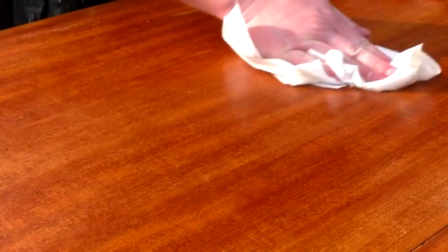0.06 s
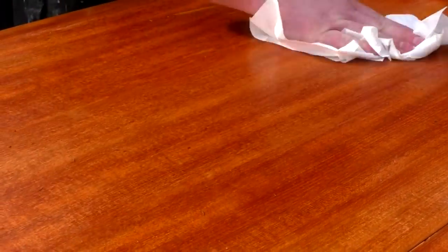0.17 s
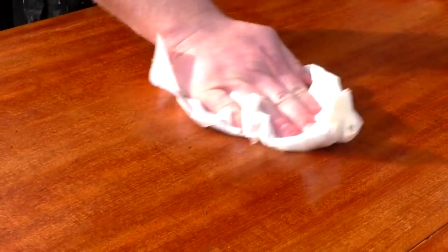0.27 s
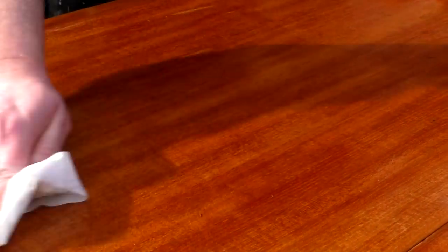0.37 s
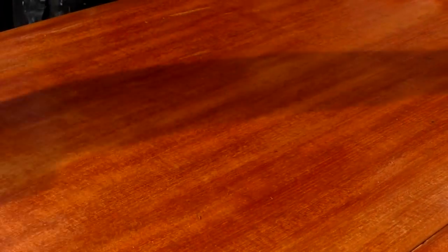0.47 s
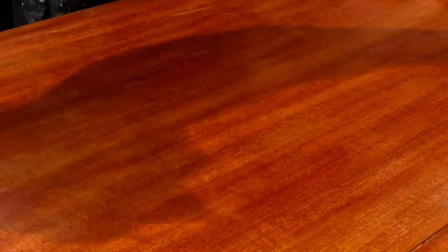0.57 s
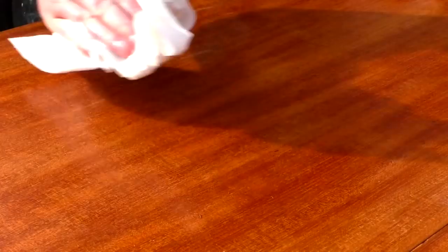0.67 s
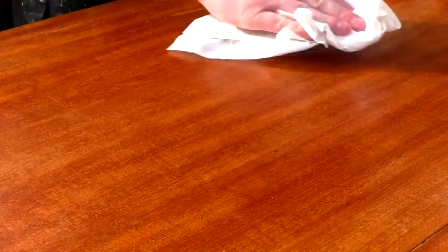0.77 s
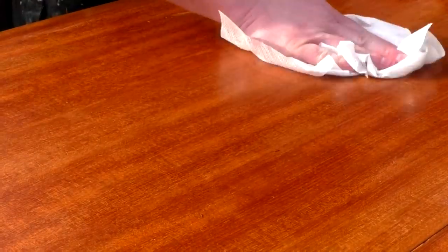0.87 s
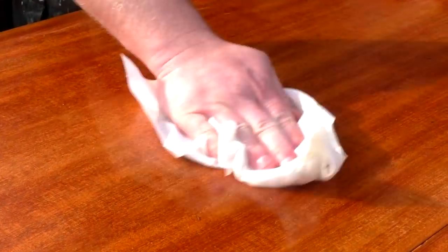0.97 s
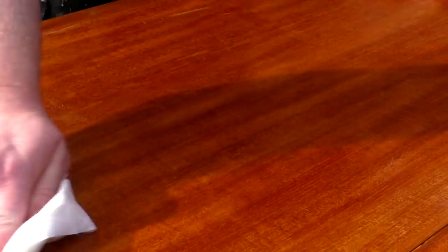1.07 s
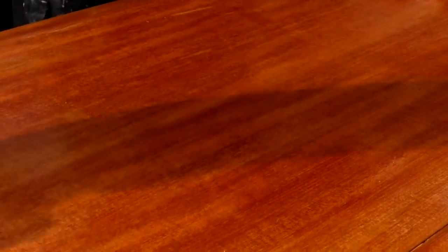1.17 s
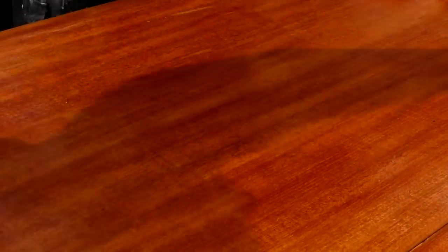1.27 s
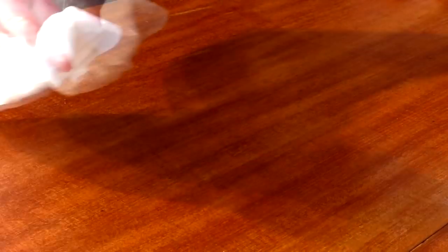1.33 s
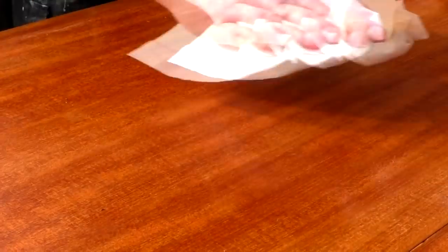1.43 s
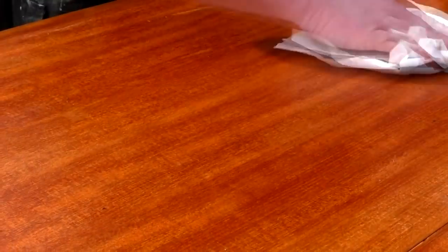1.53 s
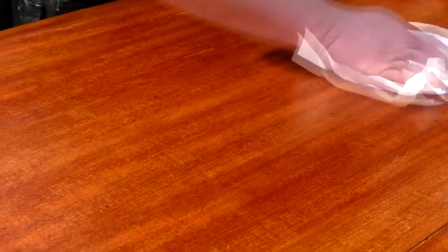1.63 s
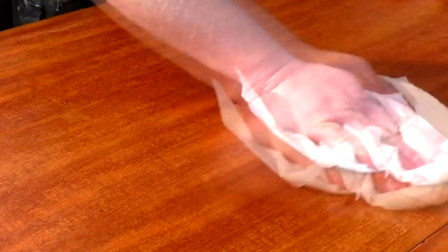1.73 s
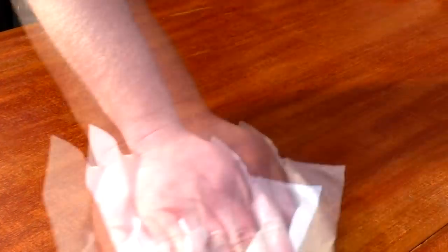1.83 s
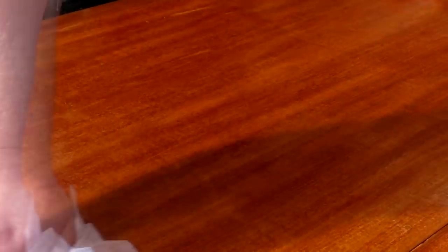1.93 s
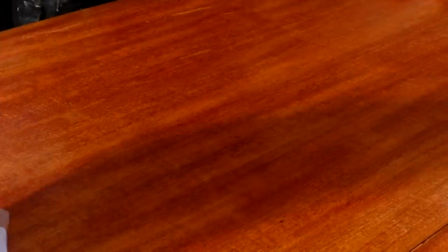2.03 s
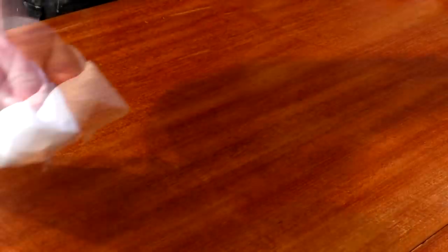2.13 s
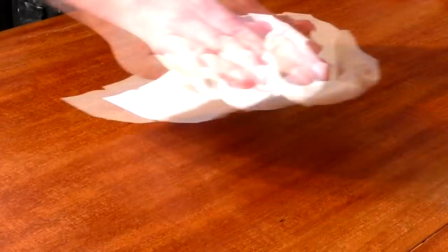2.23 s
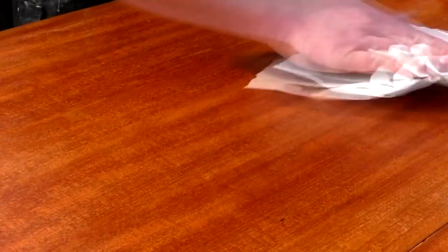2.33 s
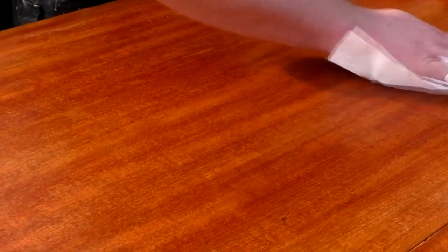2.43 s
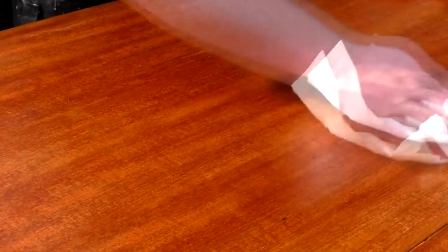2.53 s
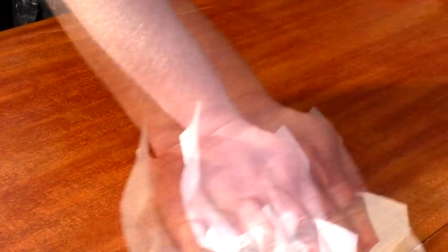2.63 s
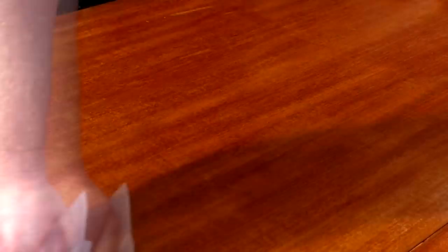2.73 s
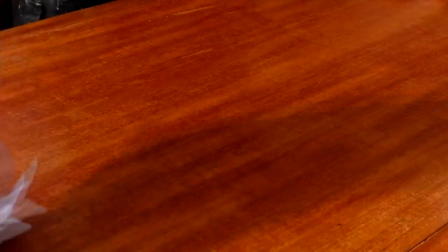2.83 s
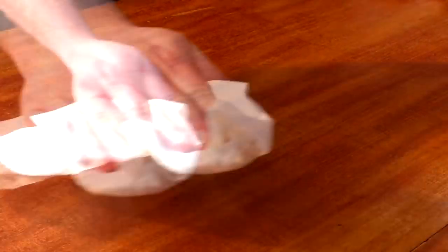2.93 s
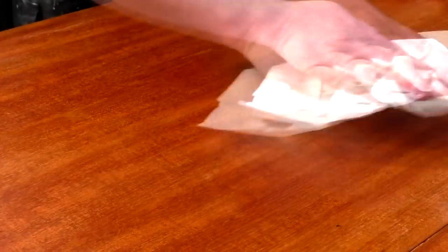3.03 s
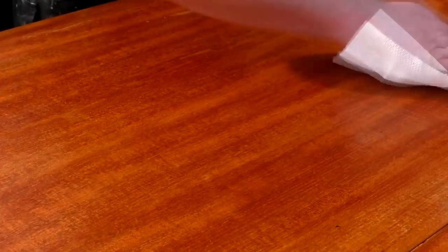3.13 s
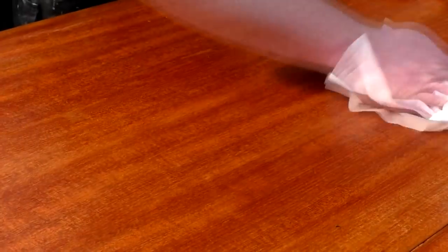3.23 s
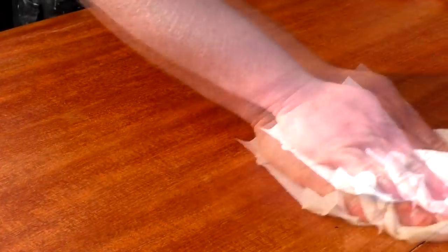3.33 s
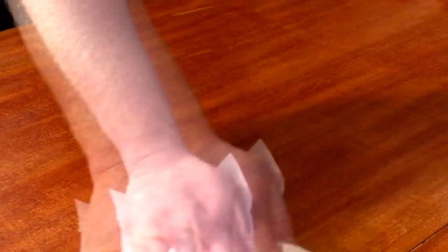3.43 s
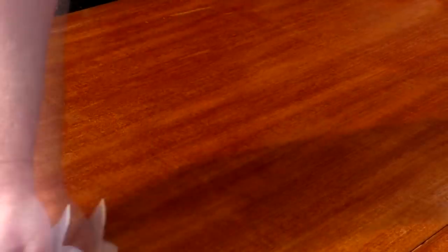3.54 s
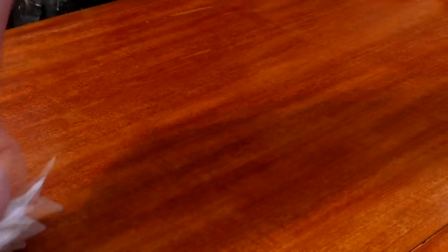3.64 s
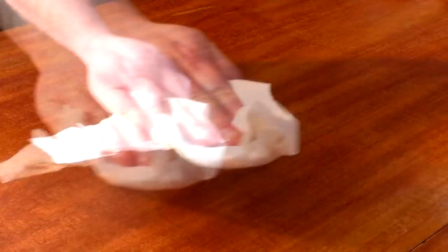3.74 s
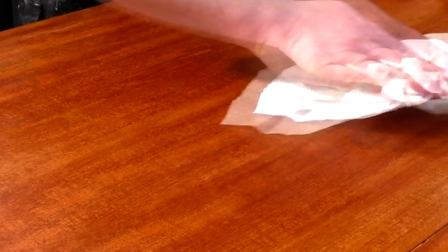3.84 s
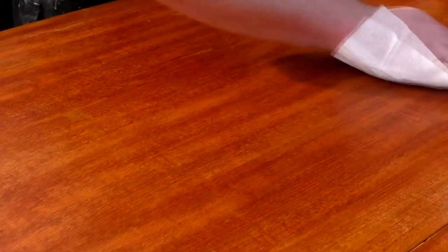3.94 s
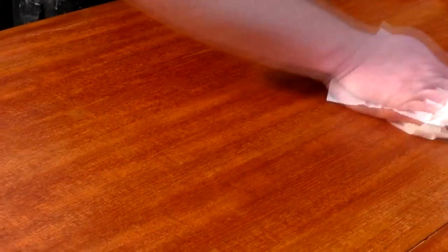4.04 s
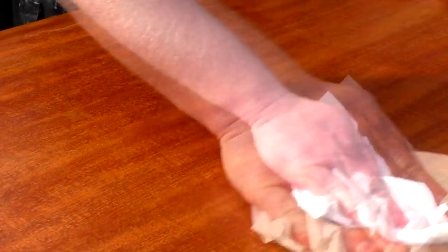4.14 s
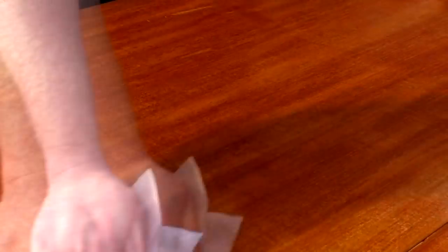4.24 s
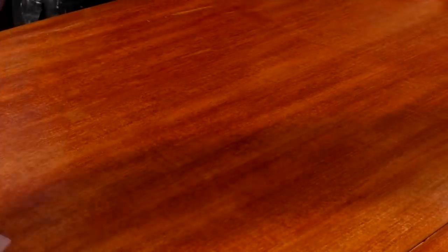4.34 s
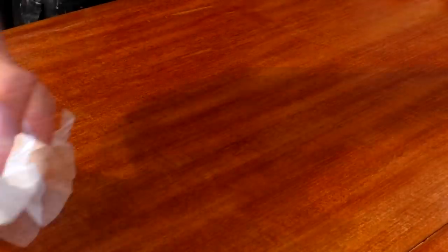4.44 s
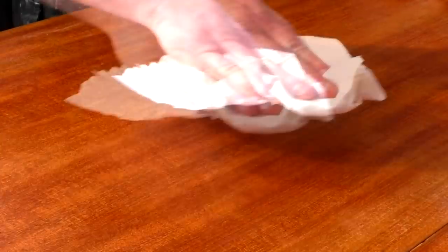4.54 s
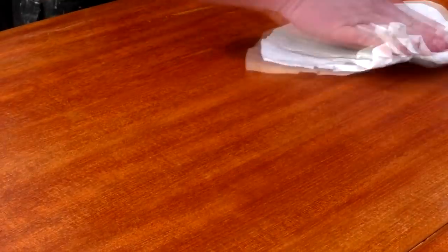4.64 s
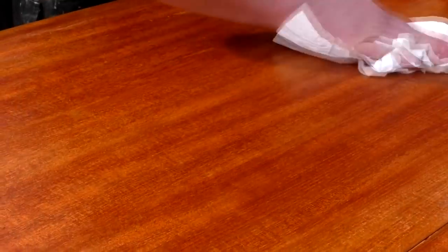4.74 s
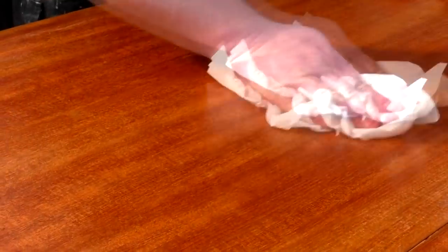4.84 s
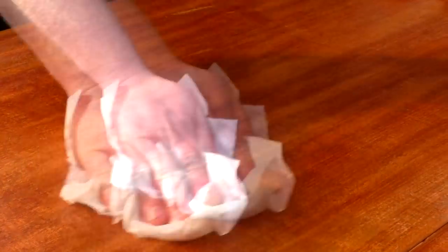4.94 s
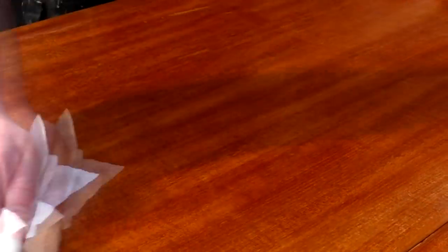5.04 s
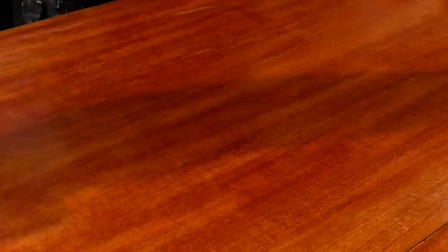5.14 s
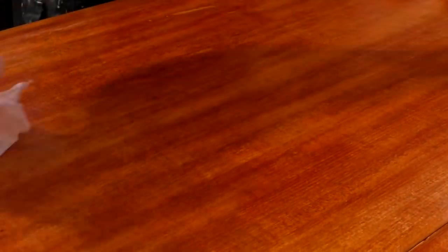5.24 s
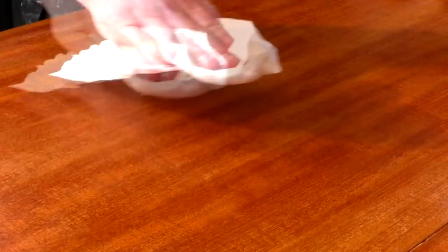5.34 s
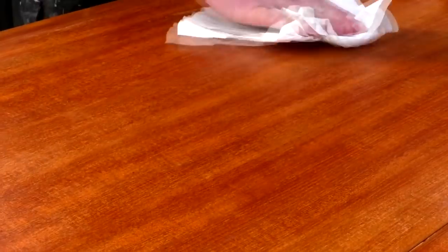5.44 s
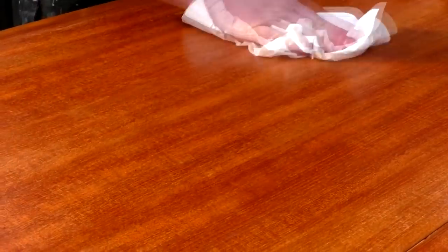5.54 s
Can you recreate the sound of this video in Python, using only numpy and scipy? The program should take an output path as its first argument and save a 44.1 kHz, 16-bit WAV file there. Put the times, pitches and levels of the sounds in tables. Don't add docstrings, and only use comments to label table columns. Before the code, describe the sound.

Close stereo pickup in a quiet workshop with a faint steady hum. A crumpled cloth swishes over varnished wood, first in a rapid flurry, then in separate strokes less than a second apart. Each shove makes the table knock dully on its legs and ring low and briefly; between strokes the cloth rustles and creeps almost silently, with tiny squeaks.

```python
import sys
import numpy as np
from scipy import signal
from scipy.io import wavfile
from scipy.ndimage import uniform_filter1d

SR = 44100
rng = np.random.default_rng(int(sys.argv[2]) if len(sys.argv) > 2 else 0)


def dump(signal):
    limited = np.clip(np.atleast_2d(signal).T, -1, 1)
    pcm = np.round(limited * 32767).astype(np.int16)
    wavfile.write(sys.argv[1], SR, pcm)


def ratio_of_db(decibels):
    return 10 ** (np.asarray(decibels, float) / 20)


N = 246866
STEP = 32
SIDES = np.array([[1], [-1]])


def rms_one(x):
    return x / np.sqrt(np.mean(x ** 2) + 1e-20)


def in_time(rows):
    s, *columns = np.transpose(rows)
    return [np.interp(np.arange(N) / SR, s, column) for column in columns]


def fine(curve):
    return np.interp(np.arange(N), np.arange(0, N, STEP), curve)


def at_hz(points, hz):
    point_hz, value = np.transpose(points)
    return np.interp(np.log(hz), np.log(point_hz), value)


def tent(start, end, start_db, end_db, rise, fall):
    t = np.arange(0, N, STEP) / SR
    plateau_db = np.interp(t, [start, end], [start_db, end_db])
    return plateau_db - rise * np.maximum(start - t, 0) - fall * np.maximum(t - end, 0)


def drift(rate_hz):
    r = np.exp(-80 * np.pi * rate_hz / SR)
    slow = signal.lfilter([1], [1, -2 * r, r * r], rng.standard_normal(N // 40 + 2002))[2000:]
    return np.interp(np.arange(N) / 40, np.arange(len(slow)), rms_one(slow))


def ring(force, hz, t60):
    r = ratio_of_db(-60 / (t60 * SR))
    w = 2 * np.pi * hz / SR
    return signal.lfilter([0, np.sin(w)], [1, -2 * r * np.cos(w), r * r], force + 1e-18)


def slips(per_s, spread_db):
    sizes = ratio_of_db(spread_db * rng.exponential(1, (2, 2, N))) * rng.standard_normal((2, 2, N))
    return sizes * (rng.random((2, 2, N)) < per_s / SR)


def coloured(source, spectrum, likeness, patchy_db, tilt=((100, 0), (200, 0))):
    out, together = 0, drift(22.0)
    lowest, highest = spectrum[0][0], spectrum[-1][0]
    edges = np.geomspace(lowest, highest, int(3 * np.log2(highest / lowest)) + 2)
    for k, (low, high) in enumerate(zip(edges, edges[1:])):
        band = signal.butter(2, [low, high], "band", fs=SR, output="sos")
        mid, side = signal.sosfilt(band, source[k % 2])
        hz = np.sqrt(low * high)
        alike = np.clip(at_hz(likeness, hz), -1, 1)
        flicker_db = patchy_db * (0.7 * together + 0.83 * drift(2.8))
        gain = ratio_of_db(at_hz(spectrum, hz) + flicker_db)
        lean = ratio_of_db(at_hz(tilt, hz) / 2 * SIDES)
        out = out + gain * lean * (np.sqrt(1 + alike) * mid + np.sqrt(1 - alike) * side * SIDES)
    return rms_one(out)


def glides(rows, rough, blur_hz=0):
    out, waver, flutter = np.zeros(N), drift(55), drift(25)
    for s, length, level_db, start_hz, end_hz in rows:
        at = int(s * SR) + np.arange(int(1.24 * length * SR))
        hz = np.linspace(start_hz, end_hz, len(at)) * (1 + rough * waver[at])
        fading_db = level_db + 4.0 + 4.17 * flutter[at] - 9.6 * np.linspace(0, 1, len(at))
        swell = np.sqrt(np.hanning(len(at))) * ratio_of_db(fading_db)
        out[at] += swell * np.sin(2 * np.pi * np.cumsum(hz) / SR)
    return out * drift(blur_hz) if blur_hz else out


# (frequency [Hz], level [dB per Hz])
ROOM = [(15, -44), (25, -12), (60, -11), (91, -3), (161, 1.5), (234, -5), (360, -5.5), (447, -12),
        (555, -13), (809, -15), (1390, -12.5), (1770, -22.5), (3110, -22.5), (5630, -45.5), (12500, -43),
        (15700, -52)]
# (frequency [Hz], left-right likeness [0..1])
ROOM_LIKENESS = [(60, 0.98), (180, 0.99), (550, 0.84), (1650, 0.41), (4970, 0.16), (15000, 0.27)]
# (frequency [Hz], left over right [dB])
ROOM_TILT = [(60, -0.5), (240, -1), (950, -1.5), (3770, 3.5), (15000, 5)]
# (frequency [Hz], width [Hz], level [dB])
ROOM_TONES = [(450.2, 28, -74.5), (227.8, 19, -74.5), (703, 18, -82.5), (95.2, 16, -73)]


def room():
    noise = rng.standard_normal((2, 2, N))
    hum = ratio_of_db(-61.5) * coloured(noise, ROOM, ROOM_LIKENESS, 0.65, ROOM_TILT)
    for hz, width_hz, level_db in ROOM_TONES:
        tone = ring(rng.standard_normal(N), hz, 3.8 / width_hz)
        hum += ratio_of_db(level_db + 2 * drift(2.1)) * rms_one(tone) * ratio_of_db(-2.5 * SIDES)
    return hum


# (time [s], level [dB])
DRAUGHT = [(0, -66), (.2, -56), (.35, -60), (.6, -68), (1.0, -60.5), (1.2, -65), (1.45, -76), (1.9, -67),
           (2.3, -78), (2.7, -74), (3.7, -90), (4.25, -74), (4.6, -80), (5.1, -74), (5.6, -86)]


def draught():
    band = signal.butter(2, [22, 130], "band", fs=SR, output="sos")
    lumps_db = 3.5 * np.array([drift(14), drift(14)])
    gusts = rms_one(signal.sosfilt(band, rng.standard_normal((2, N))) * ratio_of_db(lumps_db))
    pan_db = -3
    return gusts * ratio_of_db(in_time(DRAUGHT)[0] + pan_db / 2 * SIDES)


# (time [s], hiss level [dB])
CREEP = [(0, -89), (.8, -87), (1.32, -80), (1.45, -82), (1.57, -90), (2.12, -79), (2.25, -85), (2.36, -93),
         (2.9, -76), (2.96, -90), (3.12, -100), (3.73, -75), (3.79, -79), (3.83, -86), (4.6, -85),
         (5.3, -87), (5.43, -89), (5.6, -90)]
# (time at full speed [s], time slowing starts [s], hiss level at each [dB, dB], rise [dB per s])
STROKES = [
    (.03, .21, -52.5, -49.5, 150),
    (.28, .43, -48, -50.5, 700),
    (.47, .56, -60, -63, 300),
    (.99, 1.175, -51, -51, 179),
    (1.78, 2.04, -50.5, -52.5, 130),
    (2.64, 2.83, -50.5, -49, 114),
    (3.36, 3.6, -49, -47.5, 170),
    (4.11, 4.365, -51, -47.5, 190),
    (4.86, 5.15, -49.5, -54, 352),
    (5.57, 5.575, -62, -69, 198),
]
# (time from its marks [s], pressure that lifts the wood colour [dB])
ALONG = [
    (-.15, 0),
    (0, -3),
    (0, 0),
    (0, 1),
    (.12, 12),
]
# (time [s], hiss level [dB], pressure [dB], rise [dB per s],
# fall [dB per s])
BRUSHES = [(.93, -58, 2.5, 400, 300), (2.434, -73, -2, 150, 60), (2.989, -69.5, 7.5, 500, 480),
           (2.8, -76, -20, 1800, 38), (3.936, -71, -2, 1500, 68), (4.04, -64, -14, 370, 700),
           (4.535, -69.5, 16, 604, 259), (4.565, -69.5, 1, 304, 600), (5.215, -61, 4, 202, 349),
           (2.2, -79, 1, 100, 67), (2.49, -70.5, 18, 292, 300), (4.705, -72, 3, 1500, 40),
           (4.8, -68, 5, 600, 100), (5.468, -77, -4, 1500, 20), (1.28, -70, 1, 300, 250),
           (5.33, -74.5, 2.5, 130, 149), (4.41, -62.5, 8, 148, 300), (0.223, -66, 2, 400, 600),
           (1.47, -84.5, 8, 150, 150), (2.78, -56.5, 8, 150, 150), (.42, -61, 6, 200, 300),
           (1.66, -62.5, 4, 500, 300), (3.262, -61, 0, 1200, 200), (2.875, -62, 2, 100, 1200),
           (2.92, -70, 4, 100, 500), (2.01, -55, -6, 200, 200), (1.965, -56.5, 7, 150, 150),
           (3.52, -58, 5, 150, 150), (1.134, -59, 5, 150, 150), (5.05, -62, 5, 200, 200)]


def sweeps():
    t = np.arange(0, N, STEP) / SR
    lead, pressure_db = np.transpose(ALONG)
    moves = [(in_time(CREEP)[0][::STEP], -2.5)]      # (hiss dB, pressure dB)
    slowing, snatch = 259, 461
    ease_s, late_share = 0.028, 0.85
    for k, (full, slows, full_db, slows_db, rise) in enumerate(STROKES):
        fall = snatch if k in (0, 4, 5) else slowing
        level_db = tent(full, slows, full_db, slows_db, rise, fall)
        ease = int(2 * ease_s * SR / STEP * min(1, slowing / rise)) + 1
        level_db = uniform_filter1d(level_db, ease)
        level_db += 0.5 * np.sin(np.pi * np.clip((t - full) / (slows - full), 0, 1))
        late = full + late_share * (slows - full)
        marks = lead + [full, full, late, slows, slows]
        moves.append((level_db, np.interp(t, marks, pressure_db)))
    for s, db, press_db, rise, fall in BRUSHES:
        moves.append((tent(s, s, db, db, rise, fall), press_db))
    powers = [ratio_of_db(2 * level_db) for level_db, _ in moves]
    total = sum(powers)
    pressure = sum(power * press_db for power, (_, press_db) in zip(powers, moves)) / total
    return fine(10 * np.log10(total)), fine(pressure)


# (time [s], peak level [dB])
RUSTLES = [(0.26, -37.5), (0.6978, -53.5), (0.771, -58), (0.856, -50), (0.9144, -55), (1.225, -37),
           (1.34, -54), (1.584, -69), (1.648, -42.5), (2.4034, -50), (2.495, -42), (2.96, -50.5),
           (3.131, -51), (3.055, -62), (3.85, -62), (3.168, -53), (3.191, -47.5), (3.259, -42),
           (3.7664, -54), (3.934, -60), (4.014, -41), (4.516, -54), (4.697, -61), (4.777, -44), (4.84, -56),
           (5.463, -53), (5.5044, -52), (5.57, -43)]


def rustle_envelope():
    out, decay_s = np.zeros(N), 0.011
    t = np.arange(int(8 * decay_s * SR)) / (decay_s * SR)
    for s, peak_db in RUSTLES:
        puff = ratio_of_db(peak_db - 7.5) * (1 - np.exp(-1.5 * t)) ** 2 * np.exp(-t)
        at = int((s - .003) * SR)
        out[at:at + len(t)] += puff[:N - at]
    return out


# (frequency [Hz], level [dB per Hz])
FIBRE = [(2650, -12), (4500, -3), (5940, -6), (7500, -6), (9000, -2), (11200, -1), (15100, -8.5),
         (15700, -12)]
# (frequency [Hz], level [dB per Hz])
WOOD = [(1060, -18), (1800, -3.5), (2580, 2.5), (2870, 2.5), (4030, -0.5), (5000, -4.5), (5930, -9),
        (6500, -21), (8450, -13), (14300, -120)]
# (frequency [Hz], level [dB per Hz])
BODY = [(410, -37), (700, -7.5), (771, -18), (1310, 5.5), (1410, -2.5), (2100, -3), (2730, -27),
        (4620, -120)]
# (frequency [Hz], left-right likeness [0..1])
LIKENESS = [(60, 0.94), (110, 0.97), (200, 0.96), (380, 0.89), (700, 0.53), (1290, 0.91), (2380, 0.98),
            (4400, 0.96), (8120, 0.99), (15000, 0.95)]
# (time [s], left over right [dB])
PLACE = [(0.0, 3.0), (0.19, -1.0), (0.41, 0.0), (0.54, 4.5), (1.01, -1.5), (1.25, 4), (1.72, -2.5),
         (2.15, 3.5), (2.66, -3.5), (2.96, 4.5), (3.27, -2.0), (3.41, -2.0), (3.71, 3), (4.18, -3),
         (4.43, 3), (4.83, -1.5), (5.24, 3.5), (5.6, -1.0)]
# (time [s], wood colour [dB], hand's rub [dB])
GRIP = [(0, 2.5, 1), (.3, -3.5, -1.5), (.5, 2.5, 2), (1.1, 0.5, -1), (1.3, 1.5, 2), (1.75, 2, -1.5),
        (1.9, -1, 0.5), (2.05, 1, 2), (2.5, 2, 0), (2.8, 1, 0), (3.3, 1.5, -1.5), (3.5, -3.5, -1.5),
        (4.1, 0.5, -1), (4.3, -2.5, -5), (4.5, -3.5, 2.5), (4.88, -2.5, -5.5), (5.15, -1, -2.5),
        (5.6, -2, -0.5)]


def cloth():
    hiss_db, pressure_db = sweeps()
    pan_db, = in_time(PLACE)
    wood_db, hand_db = in_time(GRIP)
    rub_db = (0.51 - 1) * (hiss_db + 64) + 0.26 * pressure_db + hand_db
    pressure_db = pressure_db + wood_db
    flick = rustle_envelope()
    fibre = coloured(slips(16000, spread_db=1.5), FIBRE, LIKENESS, patchy_db=0.75)
    wood = coloured(slips(9000, spread_db=1.5), WOOD, LIKENESS, patchy_db=0.05)
    body = coloured(slips(4000, spread_db=1.0), BODY, LIKENESS, patchy_db=1.0)
    fibre_gain = np.hypot(ratio_of_db(hiss_db), flick)
    wood_gain = np.hypot(ratio_of_db(hiss_db + pressure_db - 0.82), ratio_of_db(3.0) * flick)
    body_gain = np.hypot(ratio_of_db(hiss_db + rub_db - 0.5), ratio_of_db(-2.0) * flick)
    lean = pan_db / 2 * SIDES
    sound = fibre_gain * fibre * ratio_of_db(1.2 * lean)
    sound += wood_gain * wood * ratio_of_db(1.1 * lean)
    sound += body_gain * body * ratio_of_db(0.61 * lean)
    return sound * ratio_of_db(0.91 * drift(16.4))


# (time [s], peak level [dB], deep modes [dB], hard modes [dB])
ROCKS = [(0.016, -32, 0, -18), (0.156, -41, 10, -14), (0.346, -30, -4.5, -20.5), (0.447, -23, -6, -12.5),
         (0.466, -33, 1.5, -7), (0.77, -54.5, 11, -28), (0.922, -45.5, 6, -9.5), (1.036, -27, -1, -17),
         (1.301, -47, 9.5, -5.5), (1.338, -46.5, -1, -11), (1.618, -41.5, -1, -35), (1.661, -42, 4.5, -11),
         (1.707, -25.5, -1, -16.5), (1.824, -28.5, 1.5, -16.5), (2.578, -27, 1, -12.5),
         (2.693, -27.5, 0, -15.5), (2.863, -44, 1, -20), (3.191, -32.5, 3, -14), (3.236, -41, 5, -13.5),
         (3.357, -27.5, 0.5, -15), (4.099, -28.5, -4, -18), (4.118, -35, -11, -9.5),
         (4.226, -26, -3, -15.5), (4.528, -36, -0.5, -22), (4.557, -44.5, -14, -14), (4.871, -35, 4, -22),
         (5.019, -27, -1.5, -14), (5.578, -48, 7, -27)]
# (time [s], peak level [dB], hard modes [dB], frequency struck best [Hz])
TAPS = [
    (0.189, -43, -11.5, 283),
    (0.502, -31, -7.5, 650),
    (1.891, -39.5, -6, 285),
    (2.602, -40.5, -4, 313),
    (3.329, -51, -4, 460),
    (5.06, -37, -11.5, 385),
    (5.085, -47, -14, 377),
    (5.115, -46.5, 6, 506),
    (5.204, -41.5, -4, 390),
]


def knock_forces():
    rocks = [(*rock, 3.02, 310.4) for rock in ROCKS]
    taps = [(s, db, -42.5, hard_db, 0.91, hz) for s, db, hard_db, hz in TAPS]
    knocks = np.array(rocks + taps)
    deep, main, hard = np.zeros((3, len(knocks), 1400))
    for k, (_, peak_db, deep_db, hard_db, contact_ms, _) in enumerate(knocks):
        luck = rng.standard_normal(8)
        width = int(contact_ms * SR / 1000)
        pulse = np.hanning(width + 2)[1:-1] / width * ratio_of_db(peak_db - 10.0)
        main[k, 110:110 + width] = pulse
        main[k, 260:260 + width] -= 1.14 * main[k, 110:110 + width]
        deep[k] = -main[k] * ratio_of_db(deep_db)
        for bounce in range(4):
            lag = int((0.005003 * bounce + 0.001384 * abs(luck[bounce])) * SR)
            click_db = peak_db + hard_db - 11.0 - 5.56 * abs(bounce - .7)
            hard[k, lag] = ratio_of_db(click_db) * np.sign(luck[4 + bounce])
    hard = signal.lfilter([.2], [1, -.8], hard)
    return knocks[:, :1], knocks[:, 5:], deep, main, hard


# (time [s], level [dB])
SHOVES = [
    (0, -37.5),
    (.51, -36.5),
    (1.18, -45),
    (2.07, -53.5),
    (3.37, -45.5),
    (4.19, -46.5),
    (5.19, -50),
]


def drag_force():
    shoves = sum(ratio_of_db(tent(s, s, db, db, rise=94, fall=88)) for s, db in SHOVES)
    return rng.standard_normal(N) * fine(shoves + ratio_of_db(-66.5)) * ratio_of_db(drift(32))


# (frequency [Hz], level [dB], t60 [s])
DEEP_MODES = [(97.5, -2.5, 0.35), (126.24, -6.5, 0.43), (140, 9, 0.026)]
# (frequency [Hz], level [dB], t60 [s])
MAIN_MODES = [(166.7, 1.5, 0.21), (192.7, 5, 0.072), (239.2, -5.5, 0.26)]
# (frequency [Hz], level [dB], t60 [s])
HARD_MODES = [(287.3, -6, 0.18), (334.5, 1, 0.094), (386.2, -7.5, 0.32), (413, 3, 0.12), (476.4, 0, 0.11),
              (527, -9, 0.053), (654, 3, 0.044), (746, -3.5, 0.016), (920, -0.5, 0.013), (1275, -5, 0.048),
              (1730, -27, 0.017), (2600, -14, .015)]
# (time [s], length [s], level [dB], start [Hz], end [Hz])
SHUDDERS = [(.03, 0.049, -40.5, 165, 175), (.36, 0.043, -44.5, 172, 173), (.53, 0.1, -45, 163.2, 177.4),
            (.64, 0.04, -53.5, 172, 170), (.92, 0.065, -52, 150, 133), (1.05, 0.084, -54, 152, 163),
            (1.33, 0.075, -49, 155, 163), (1.61, 0.092, -41, 147, 181), (1.73, 0.17, -46, 175, 156.6),
            (1.89, 0.091, -42.5, 178, 180), (2.355, 0.17, -50.5, 159.4, 164),
            (2.61, 0.065, -40.5, 162, 182), (2.70, 0.036, -39, 167, 167), (3.23, 0.063, -42.5, 159, 139),
            (3.39, 0.069, -60, 154, 140), (4.11, 0.06, -37.5, 158.4, 177), (4.24, 0.041, -36.5, 169.6, 164),
            (4.145, .04, -44, 170, 175), (4.29, .045, -51, 140, 110), (4.385, 0.034, -52, 150, 170),
            (4.527, .025, -41.5, 145, 150), (4.56, 0.023, -46.5, 160, 151), (3.405, .035, -47.5, 160, 140),
            (5.03, 0.033, -36.5, 167, 179), (5.07, 0.12, -51, 165.6, 186.4)]


def table():
    times, best_hz, deep, main, hard = knock_forces()
    at = (times * SR + 30).astype(int) + np.arange(1400)
    rung = []
    groups = ((deep, DEEP_MODES, 2.1), (main, MAIN_MODES, 1.6), (hard, HARD_MODES, 2.5))
    for forces, modes, spread_db in groups:
        for hz, level_db, t60 in modes:
            favour_db = 10.1 * np.exp(-(np.log2(hz / best_hz) / 0.18) ** 2)
            chance_db = spread_db * rng.standard_normal((len(times), 1))
            force = np.zeros(N + 1400)
            np.add.at(force, at, forces * ratio_of_db(level_db + favour_db + chance_db))
            rung.append(ring(force[:N], hz, t60))
    drag = drag_force()
    shaken_modes = DEEP_MODES + MAIN_MODES + HARD_MODES[:1]
    shaken = sum(ring(drag, hz, t60) * ratio_of_db(level_db) for hz, level_db, t60 in shaken_modes)
    sound = sum(rung) + ratio_of_db(-44.5) * shaken + glides(SHUDDERS, rough=.032)
    leans = 0.036 + 0.15 * np.sign(rng.standard_normal(len(rung)))
    side = sum(mode * lean for mode, lean in zip(rung, leans))
    sound = sound * ratio_of_db(-1.1 * SIDES) - side * SIDES
    low_cut = signal.butter(3, 71.4, "high", fs=SR, output="sos")
    return signal.sosfilt(low_cut, sound)


# (time [s], ring level [dB], frequency [Hz], tick level [dB])
CRACKS = [(.448, -38, 1335, -42), (.449, -38, 700, -60), (.471, -41, 700, -60), (.505, -49, 1100, -52),
          (1.038, -49, 1320, -52), (1.185, -52, 250, -70), (1.709, -43.5, 694, -54),
          (1.716, -48, 2700, -48), (1.826, -44, 430, -58), (1.845, -47, 500, -70), (1.90, -48, 526, -65),
          (1.915, -53, 700, -70), (2.582, -47, 1300, -55), (2.59, -47, 623, -65), (2.968, -60, 1250, -66),
          (3.195, -56, 1400, -62), (3.198, -52, 600, -70), (3.38, -49, 520, -65), (4.105, -50, 430, -62),
          (4.226, -50, 1330, -56), (.19, -52, 290, -70), (.352, -46, 290, -65), (.64, -54, 300, -75),
          (1.04, -48, 520, -70), (1.72, -46, 350, -70), (5.125, -48, 250, -70), (4.53, -44, 100, -75),
          (2.70, -50, 620, -62), (5.021, -41.5, 1370, -54), (5.063, -48, 720, -65), (5.087, -52, 1500, -50),
          (5.111, -46, 1350, -60), (5.207, -47, 720, -65)]


def cracks():
    out, t = np.zeros((2, N + 3000)), np.arange(3000) / SR
    for s, ring_db, hz, tick_db in CRACKS:
        noise = rng.standard_normal((2, 3000))
        t60 = 22 / hz + .012
        fade = ratio_of_db(-60 * t / t60) * (1 - np.exp(-t * hz))
        phase = 0.37 * np.sign(noise[0, 0]) * SIDES
        tone = np.sin(2 * np.pi * hz * t + phase)
        tick = signal.lfilter([.4], [1, -.6], noise[0] + 0.25 * noise[1] * SIDES) * np.exp(-t / .003)
        at = int(s * SR)
        out[:, at:at + 3000] += ratio_of_db(ring_db) * fade * tone + ratio_of_db(tick_db) * tick
    return out[:, :N] * ratio_of_db(-.8 * SIDES)


# (time [s], length [s], level [dB], start [Hz], end [Hz])
SQUEAKS = [
    (.79, 0.17, -70, 1350, 1420),
    (1.4, 0.12, -70.5, 2310, 2450),
    (2.31, 0.13, -72, 2700, 2780),
    (2.87, 0.08, -67, 2480, 2340),
    (2.95, 0.035, -65, 1250, 1270),
]


def squeaks():
    return glides(SQUEAKS, rough=0.008, blur_hz=18)


# (time [s], length [s], level [dB], start [Hz], end [Hz])
FAR_WHISTLE = [
    (2.355, .07, -76, 2820, 2480),
    (2.42, .1, -74, 2460, 2330),
]


def far_whistle():
    return glides(FAR_WHISTLE, rough=0.004) * [[1], [-0.6]]


def scene():
    return room() + draught() + cloth() + table() + cracks() + squeaks() + far_whistle()


def low_pass(x):
    return signal.sosfilt(signal.butter(12, 15820, fs=SR, output="sos"), x)


def record(dry):
    band = signal.butter(1, (4870, 8200), "band", fs=SR, output="sos")
    side = signal.sosfilt(band, (dry[0] - dry[1]) / 2)
    mix = dry - 0.43 * side * SIDES
    return low_pass(mix)


dry = scene()
out = record(dry)
dump(out)
```